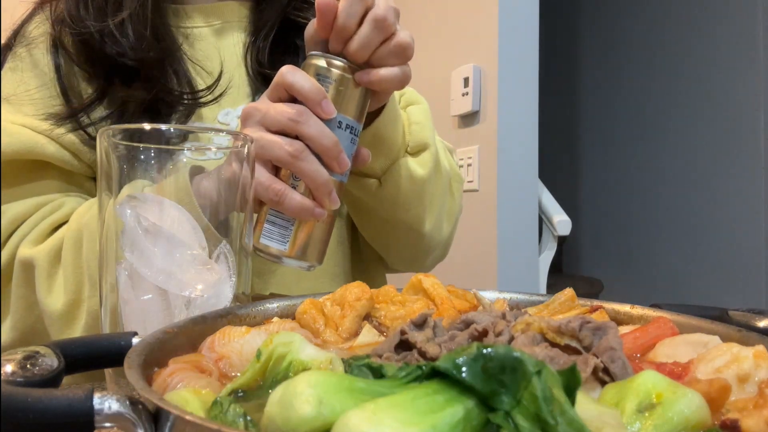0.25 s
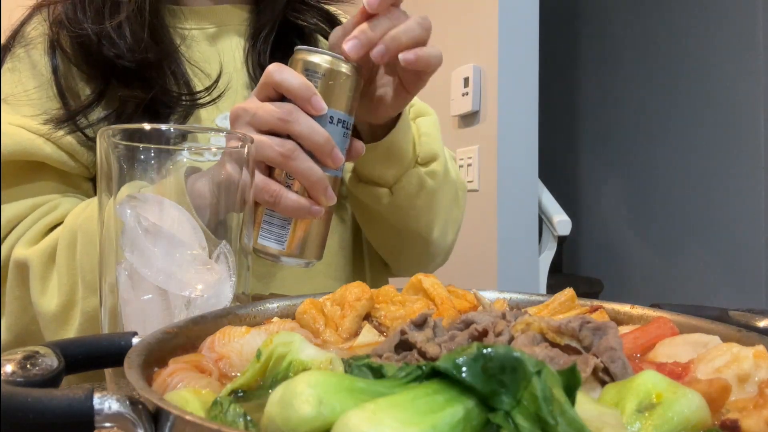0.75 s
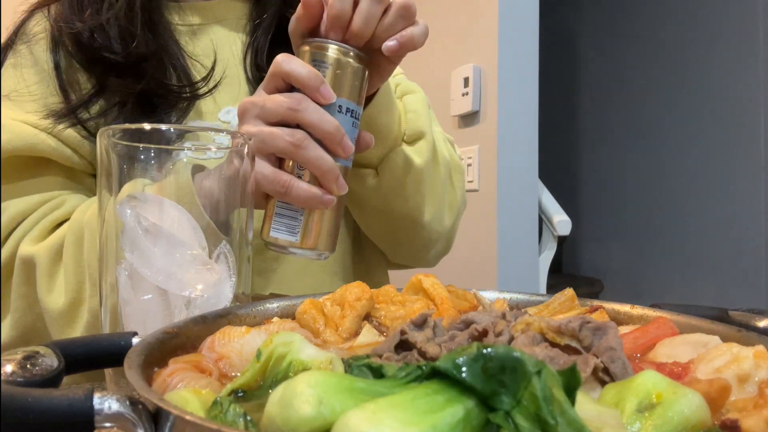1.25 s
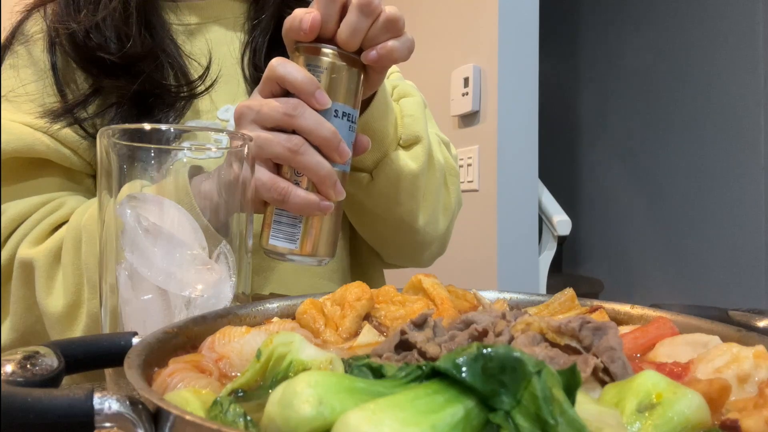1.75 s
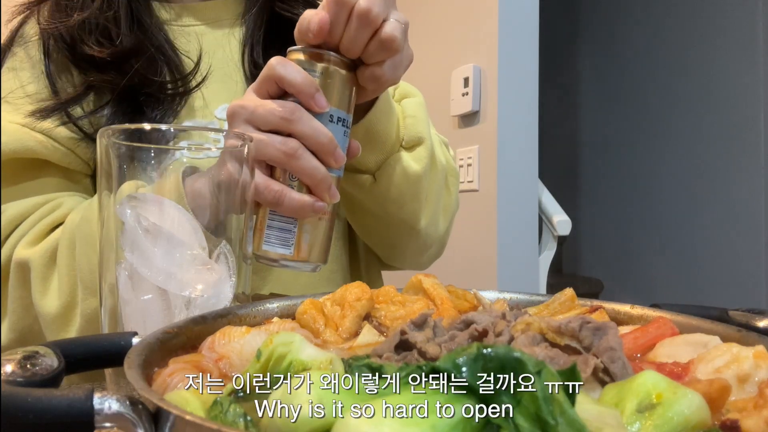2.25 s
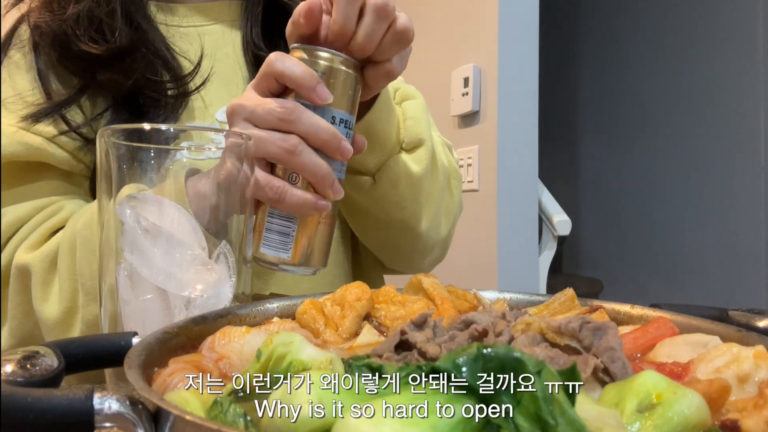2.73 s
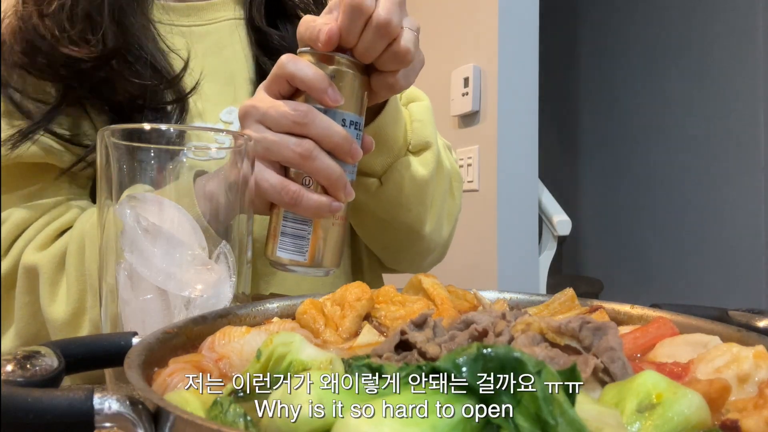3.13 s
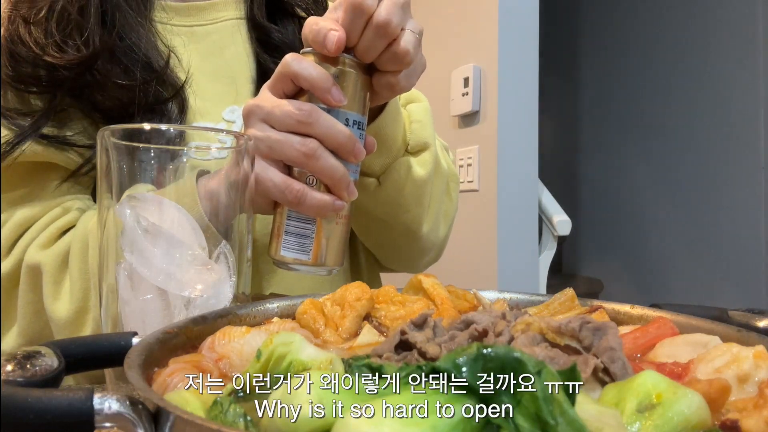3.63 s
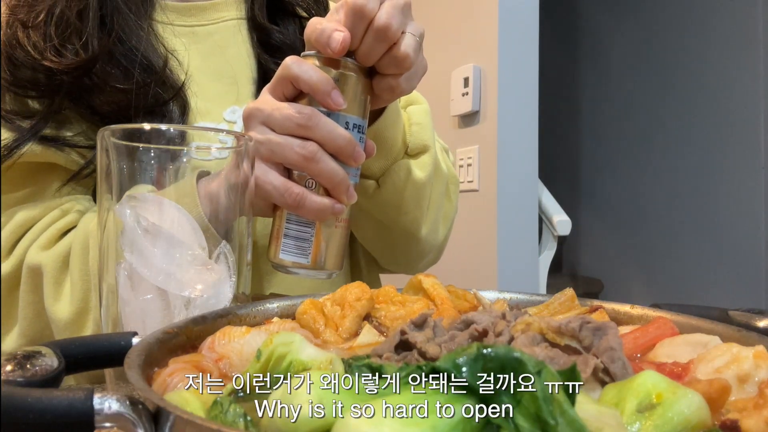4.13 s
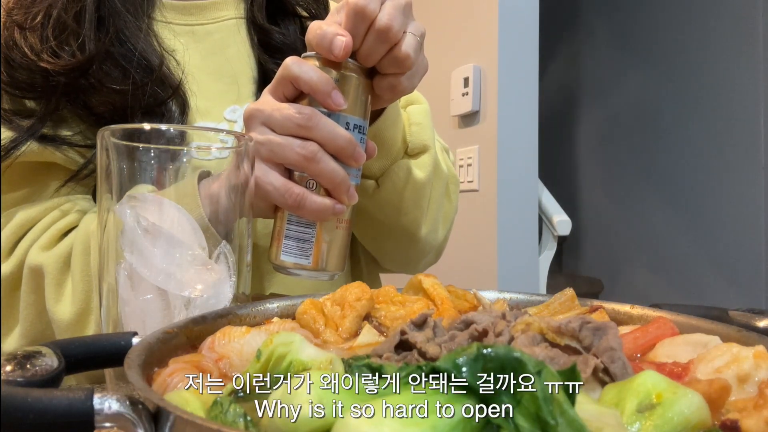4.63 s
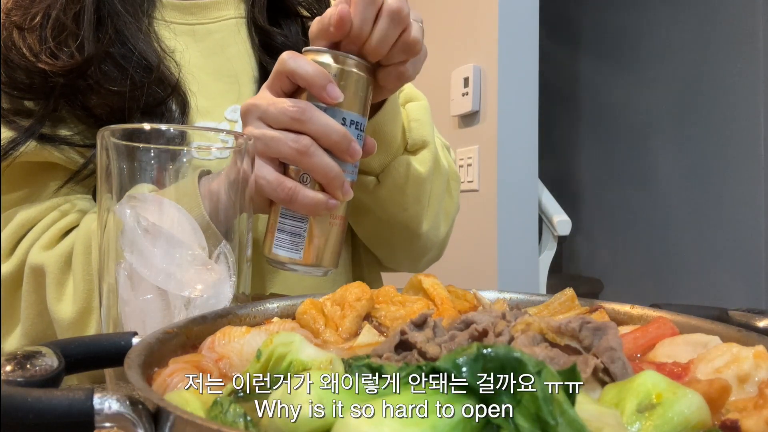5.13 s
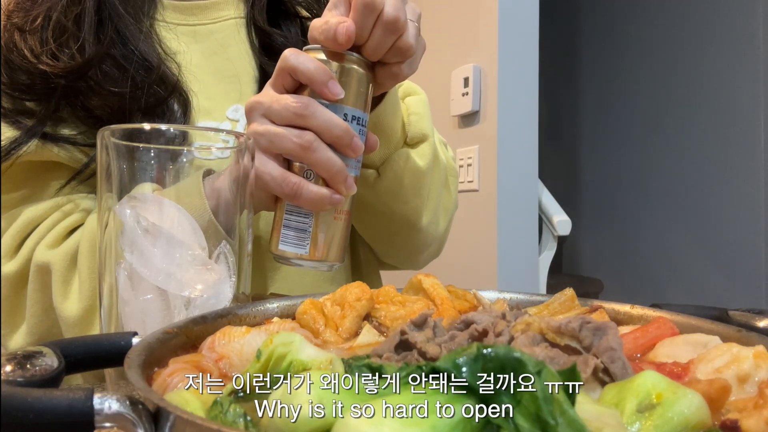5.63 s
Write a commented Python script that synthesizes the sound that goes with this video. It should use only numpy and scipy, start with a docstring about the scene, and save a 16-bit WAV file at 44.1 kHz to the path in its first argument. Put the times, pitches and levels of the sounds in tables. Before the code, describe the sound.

In a small, hard-walled room with a low, wavering fridge hum, a phone at arm's length hears a can being worked open. At 0.04 s the seal gives a thin, bright crack with a spurt of gas, fading by 0.3 s. Nail ticks fall at 0.1 and 0.35 s, the latter with a soft, hollow knuckle rap on the can. Faint hissing and small ticks continue near 1 s. From 1.4 s gas swells into a sharp, whistling, slightly droning hiss, cut off at 1.9 s by a loud metallic snap. Its echo is chopped abruptly near 2.1 s. More snaps strike at 2.3 s, the strongest, and 2.9 s, with ticks, a brief skin rustle and a dull table bump around 2.5 to 2.6 s. Very faint ticks and creaks of prying fill 3.2 to 5 s. Two final bright snaps land at 5.1 and 5.5 s, ringing briefly off the walls.

```python
"""The ring pull of a tall drink can, worked by a thumbnail, cracks the seal, then snaps five times onto the lid:
damped modes ring. Gas leaking through the seal is filtered noise that hisses, whistles and drones; the nail ticks
and creaks, skin rustles, a knuckle raps the can and an elbow bumps the table. A small hard room answers by
convolution, its echoes chopped short at one splice; a fridge hums behind. A phone an arm's length away hears it."""
import sys
import numpy as np
from scipy import signal
from scipy.fft import rfft, irfft
from scipy.io import wavfile
from scipy.ndimage import uniform_filter1d

SR = 44100
rng = np.random.default_rng(int(sys.argv[2]) if len(sys.argv) > 2 else 0)


def inscribe(sig):
    """Save sig as 16-bit PCM at rate SR to the path in sys.argv[1].

    A 1-D sig is mono; a 2-D sig holds one channel per row.
    Samples are clipped to [-1, 1] before scaling.
    """
    pcm = np.round(np.clip(np.atleast_2d(sig).T, -1, 1) * 32767)
    wavfile.write(sys.argv[1], SR, pcm.astype(np.int16))


N = 259308
T = np.arange(N) / SR

# modes of the lid rim: f/Hz, relative level/dB, t60/s
RIM_MODES = [(7340, -10, 0.0082), (7830, -6, 0.011)]
# modes of the ring pull: f/Hz, relative level/dB, t60/s
PULL_MODES = [(9300, -12.5, 0.005), (10100, -6.5, 0.0044), (11310, -11.5, .003), (12560, -8, 0.005),
              (13940, -6, 0.002)]


def undb(db):
    """Amplitude ratio: the level in dB is 20 times its decimal logarithm."""
    return 10 ** (np.asarray(db) / 20)


def level(x, db):
    """Normalise by the root mean square, the measure of mean power, to a level in dB."""
    return x * undb(db) / np.sqrt(np.mean(x ** 2))


def along(table, hz):
    """Interpolate (f/Hz, value) points on a logarithmic frequency axis, where octaves are equal steps."""
    f, v = np.transpose(table)
    return np.interp(np.log(np.maximum(hz, 1)), np.log(f), v)


def shape(x, gain):
    """Linear filtering: multiply the spectrum of x by gain(f)."""
    size = x.shape[-1]
    hz = np.arange(size // 2 + 1) * SR / size
    return irfft(rfft(x) * gain(hz), size)


def bell(hz, centre_hz, width_hz):
    """Resonance curve: the gain halves one width away from the centre."""
    return 1 / (1 + ((hz - centre_hz) / width_hz) ** 2)


def walk(rate):
    """Slow random modulation: normal levels held 1 / rate s, smoothed twice; spread near 1."""
    k = int(SR / rate)
    held = np.repeat(rng.standard_normal(N // k + 1), k)
    return 1.3 * uniform_filter1d(uniform_filter1d(held, k), k)[:N]


def ring(modes, push_s, length_s=0.12):
    """Modal superposition: decaying sines, neighbours in opposite sense, build up over the contact time; peak 1."""
    t = np.arange(int(length_s * SR)) / SR
    y = np.zeros(len(t))
    for k, (hz, db, t60) in enumerate(modes):
        y += undb(db - 60 * t / t60) * np.sin(2 * np.pi * hz * t + np.pi * k)
    y = y * np.square(1 - np.exp(-t / push_s))
    return y / np.abs(y).max()


def add(out, s, sound, db, pan_db, echo_db=0):
    """Superposition with a level difference between sides: rows are left, right and what goes to the walls."""
    i = int(s * SR)
    sound = sound[:N - i]
    row_db = np.array([[pan_db / 2], [-pan_db / 2], [echo_db]])
    out[:, i:i + len(sound)] += sound * undb(db + row_db)


def fridge():
    """Periodic motor forces give wavering tones over room air, noise whose two sides are partly correlated."""
    # motor tones: f/Hz, rms level before wavering/dB
    motor_lines = [(59.2, -84.5), (177.6, -72.5), (296.1, -75), (355.3, -67.5), (414.5, -88.5),
                   (737.5, -90), (1475, -94)]
    # spectrum of the room air: f/Hz, relative level per Hz/dB
    air_spectrum = [(20, -40.5), (45, -19), (90, -15), (170, -9.5), (230, -12.5), (330, -16), (450, -14),
                    (620, -19), (820, -29.5), (1500, -31.5), (2300, -45), (6000, -57.5), (16500, -62.5)]
    # likeness of the two sides: f/Hz, left-right correlation
    air_alike = [(60, 0.87), (130, -0.59), (290, .3), (640, -0.58), (1400, -0.44), (7000, -.2)]

    def likeness(f):
        return np.clip(along(air_alike, f), -1, 1)

    mid, side = rng.standard_normal((2, N))
    mid = shape(mid, lambda f: undb(along(air_spectrum, f)) * np.sqrt(1 + likeness(f)))
    side = shape(side, lambda f: undb(along(air_spectrum, f)) * np.sqrt(1 - likeness(f)))
    air = level(np.array([mid + side, mid - side]), -64.5) * undb([[-1.8], [1.8]])
    spread = np.array([[0], [.8]])  # phase at the left and right port, rad
    lines = 0
    for hz, db in motor_lines:
        amplitude = np.sqrt(2) * undb(db + 2.4 * walk(9))
        lines = lines + amplitude * np.sin(2 * np.pi * hz * T + 0.18 * walk(3.8) + spread)
    return air + lines


def crack_and_snaps(out):
    """Impact excitation: each blow strikes wall, shoulder, lid, rim and pull in its own mix, with a short scrape."""
    # the seal cracks first, then the pull snaps onto the lid five times: t/s, peak level of the ringing before
    # pan/dB, lid pitch f/Hz, then shares before normalising of wall/dB, shoulder/dB, rim/dB and pull/dB,
    # left minus right/dB, echo send/dB
    strikes = [(0.0416, -20.5, 5440, -14, 15, 5, 10.5, 4, -6),
               (1.8995, -13, 4755, 2.5, 2, -7.5, 4, -7, 0.5),
               (2.2893, -9, 4423, -1.5, -2, -6, 10.5, 0, 1.5),
               (2.9244, -12, 4323, 3, -19.5, 6, -10.5, -3, 2),
               (5.1244, -10.5, 4435, -5.5, 0.5, -8.5, 2, -1.5, 2.5),
               (5.4993, -11, 4170, 6, 3.5, 2.5, -8, -1.5, -0.5)]
    # modes of the can wall, damped by the grip: f/Hz, relative level/dB, t60/s
    wall_modes = [(706, -28.5, 0.016), (1208, -17, 0.011), (1666, -2.5, 0.013), (1897, -5.5, 0.011),
                  (2092, -7.5, .012)]
    # mode of the can shoulder: f/Hz, relative level/dB, t60/s
    shoulder_modes = [(2763, -12.5, 0.0063)]
    # modes of the lid: ratio to lid pitch, relative level/dB, t60 at a lid pitch of pressed_hz/s
    lid_modes = [(.83, -5, .007), (.92, -2.5, .01), (0.981, -1, .011), (1.04, 0.5, .011), (1.17, -6, .009),
                 (1.26, -8.5, 0.0089)]
    # a thumb on the lid raises its pitch and shortens its ring, at most down to shortest_ring
    pressed_hz, free_power, shortest_ring = 4590, 2.2, 0.71
    scrape_db, scrape_t60_s = -10.5, 0.018  # metal on metal

    t = np.arange(int(.1 * SR)) / SR
    for s, db, lid_hz, wall_db, shoulder_db, rim_db, pull_db, pan_db, echo_db in strikes:
        stretch = max(shortest_ring, (pressed_hz / lid_hz) ** free_power)
        lid = [(lid_hz * ratio, g, t60 * stretch) for ratio, g, t60 in lid_modes]
        parts = [(wall_modes, wall_db), (shoulder_modes, shoulder_db), (lid, 0),
                 (RIM_MODES, rim_db), (PULL_MODES, pull_db)]
        modes = [(f, g + share, t60) for table, share in parts for f, g, t60 in table]
        blow = ring(modes, 0.00055, length_s=len(t) / SR)
        noise = rng.standard_normal(len(t))
        scrape = shape(noise, lambda f: bell(f, 5500, 3600) * f / (f + 1500))
        scrape = scrape * undb(scrape_db - 60 * t / scrape_t60_s)
        add(out, s, blow + scrape[:len(blow)], db, pan_db, echo_db)


def leak(out):
    """Turbulent jet noise hisses high, whistles in the rim and, when strong, drones in the can wall."""
    # gas through the seal: t/s, level of the hiss before flutter and side gains/dB
    jet_course = [(.044, -47), (.1, -70), (.15, -58.5), (.23, -60.5), (.32, -75.5), (.75, -78), (.92, -72),
                  (1.02, -76.5), (1.33, -81), (1.44, -67), (1.72, -52), (1.78, -42), (1.896, -38),
                  (1.912, -59)]
    # hiss spectrum: f/Hz, relative level per Hz/dB
    jet_spectrum = [(8000, -32), (9500, -4.5), (10700, -12), (12200, -2.5), (13800, -1.5), (15200, -2.5),
                    (15800, -15), (16300, -33.5)]
    # whistle bands: f/Hz, width before broadening by 1.2/Hz, relative level/dB
    whistle_bands = [(4570, 980, -18.5), (5360, 480, -12.5), (6800, 720, -8), (8090, 510, 4),
                     (9090, 260, -4)]
    # the whistle keeps pace with the jet, then falls behind above drowned_db (slope in dB per dB)
    whistle_top_db, drowned_db, whistle_slope = 3.5, -58, 0.5
    # drone relative to a jet of -40.5 dB; its share grows with the jet (slope in dB per dB)
    drone_ref_db, drone_slope = -21.5, 0.75

    jet_db = np.interp(T, *np.transpose(jet_course), -200, -200)
    whistle_db = whistle_top_db - whistle_slope * np.maximum(jet_db - drowned_db, 0)
    drone_db = drone_ref_db + drone_slope * (jet_db + 40.5)

    def whistle_gain(f):
        return sum(undb(g) * bell(f, centre, 1.2 * width) ** 2 for centre, width, g in whistle_bands)

    jet = shape(rng.standard_normal(N), lambda f: undb(along(jet_spectrum, f)))
    whistle = shape(rng.standard_normal(N), whistle_gain)
    drone = shape(rng.standard_normal(N), lambda f: bell(f, 1700, 280) + 0.073 * bell(f, 3300, 900))
    gas = level(jet, 0) + level(whistle, 0) * undb(whistle_db) + level(drone, 0) * undb(drone_db)
    flutter_db = 1.0 * walk(25)
    out += gas * undb(jet_db + flutter_db) * undb([[1.5], [-1.5], [-6]])  # left, right, walls


def room(x):
    """Reverberation: echoes begin at the first wall, fill in and decay band by band, independent on each side."""
    # decay time of the echoes: f/Hz, t60/s
    echo_decay = [(700, 0.71), (1500, 0.39), (4000, 0.55), (8000, 0.35), (13000, 0.19)]
    room_db, first_wall_s, fill_s = -3, 0.007, 0.0025
    splice_s = 2.088  # echoes of all earlier sounds end here

    t = np.arange(int(.8 * SR)) / SR
    late = np.maximum(t - first_wall_s, 0)
    # early echoes vary widely in strength, later ones blend evenly
    uneven_db = 6.88 * rng.standard_normal((2, len(t))) * np.exp(-late / 0.089)
    noise = rng.standard_normal((2, len(t))) * undb(uneven_db)
    tail = 0
    for hz in 250 * 2. ** np.arange(7):
        band = shape(noise, lambda f: np.maximum(1 - np.abs(np.log2(f / hz + 1e-9)), 0))
        tail = tail + band * undb(-60 * late / along(echo_decay, hz))
    tail = tail * (1 - np.exp(-late / fill_s))
    tail = tail * undb(room_db) / np.sqrt(np.sum(tail ** 2) / 2)

    def echo(part):
        return signal.fftconvolve(part[None], tail, axes=1)[:, :N]

    before = T < splice_s
    chop = np.clip((splice_s - T) / 0.0023, 0, 1)
    return echo(x * before) * chop + echo(x * ~before)


def ticks(out):
    """Friction excitation: a brief scrape shakes two wall modes and, in a share set per tick, lid, rim and pull."""
    # the nail taps and catches on the pull: t/s, peak level before pan/dB, share of lid, rim and pull before offsets/dB
    taps = [(0.095, -37, 6), (0.3541, -35, 8.5), (0.9394, -61.5, 7), (1.0834, -48.5, 5), (2.108, -68, -10),
            (2.2444, -72, -2.5), (2.4592, -47, -2.5), (2.5227, -46, -23), (2.703, -62, -14.5),
            (3.2206, -58.5, -8.5), (3.8352, -72.5, -4), (4.0917, -70, -3), (4.2152, -68, -11),
            (4.3244, -67, -5.5), (4.3444, -71.5, -15), (4.3644, -71.5, -14), (4.4548, -67, -14),
            (4.478, -66, -17), (4.5386, -65, -17), (4.562, -64, -5.5), (4.591, -70, -8), (4.6093, -69, -12),
            (4.7401, -61, -6), (4.7644, -70, -11.5), (4.7884, -70, -6.5), (5.73, -63.5, -5.5),
            (5.8394, -75, -2)]
    # wall pitch at -67 dB; harder ticks ring higher; relative random spread
    base_hz, hz_per_db, spread = 1901.5, 8.5, 0.036
    scrape_s = 0.001247
    creak_start, creak_end, creak_count = 3.55, 5.1, 7  # s, s: faint creaks while the nail pries

    t = np.arange(int(.03 * SR)) / SR
    creaks = [(creak_start + (creak_end - creak_start) * u, -78 + 5 * v, -18)
              for u, v in rng.random((creak_count, 2))]
    for s, db, crack_db in list(taps) + creaks:
        noise = rng.standard_normal(len(t))
        hz = (base_hz + hz_per_db * (db + 67)) * (1 + spread * noise[0])
        modes = [(hz, 0, .005), (1.17 * hz, -3, .004)]
        modes += [(3200, crack_db - 12, .005), (4500, crack_db - 4.5, .004), (5700, crack_db - 7, .004)]
        modes += [(f, g + crack_db - 4.5, t60) for f, g, t60 in RIM_MODES + PULL_MODES]
        scrape = noise * t * np.exp(-t / scrape_s)
        tick = signal.fftconvolve(ring(modes, .0001), scrape)
        add(out, s, tick / np.abs(tick).max(), db, -1.5, -8)  # the whole tick sends little echo


def knock(out):
    """Impact excitation: a knuckle raps the can, whose lower modes ring."""
    # modes of the rapped can: f/Hz, relative level/dB, t60/s
    knock_modes = [(802, -3.5, 0.088), (1436, -7.5, 0.082), (2163, -9, 0.033)]
    add(out, 0.354, ring(knock_modes, 0.0009), -51, 3, -8)


def rustle(out):
    """Friction noise: skin drags over painted metal in uneven grains; each slide swells and fades."""
    # fingers slide on the can: middle t/s, level at the middle/dB, time to fall to 1/e/s
    slide_rows = [(2.512, -62, 0.014), (2.73, -77, 0.071)]
    noise = rng.standard_normal(N)
    skin = shape(noise, lambda f: bell(f, 1600, 500) + bell(f, 5260, 1500) + .5 * bell(f, 12130, 2900))
    slides = sum(undb(db) * np.exp(-((T - s) / half_s) ** 2) for s, db, half_s in slide_rows)
    out += level(skin * undb(3 * walk(160)), 0) * slides


def thud(out):
    """Impact excitation: an elbow bumps the table, whose three low modes die away."""
    # bump of the table: t/s, peak level/dB, f of the middle mode/Hz, t60/s
    bump = (2.606, -48, 170, .04)
    s, db, hz, t60 = bump
    modes = [(.6 * hz, -4, t60), (hz, 0, t60), (2.5 * hz, -3, t60)]
    add(out, s, ring(modes, 0.0017), db, 0, -20)


def wide(hz):
    """Stereo separation as a low-pass law: 1 where the sides stay apart, falling to 0 in the treble."""
    return 1 / (1 + (hz / 10100) ** 12)


def scene():
    """Superposition of near sources, their echoes and the fridge."""
    near = np.zeros((3, N))  # left, right, to the walls
    for source in (crack_and_snaps, leak, ticks, knock, rustle, thud):
        source(near)
    # direct sound reaches the left port later; the lag shrinks in the treble
    lag_s = 4.5e-5
    near[0] = shape(near[0], lambda f: np.exp(-2j * np.pi * f * lag_s * wide(f)))
    return near[:2] + room(near[2]) + fridge()


def record(dry):
    """Mid-side filtering: the side signal is 8.5 dB weaker in the treble, then a steep low-pass cuts the top."""
    mid, side = (dry[0] + dry[1]) / 2, (dry[0] - dry[1]) / 2
    side = shape(side, lambda f: wide(f) + undb(-8.5) * (1 - wide(f)))
    top_cut = signal.ellip(10, .2, 70, 16200, fs=SR, output="sos")
    return signal.sosfilt(top_cut, [mid + side, mid - side])


dry = scene()
out = record(dry)
inscribe(out)
```